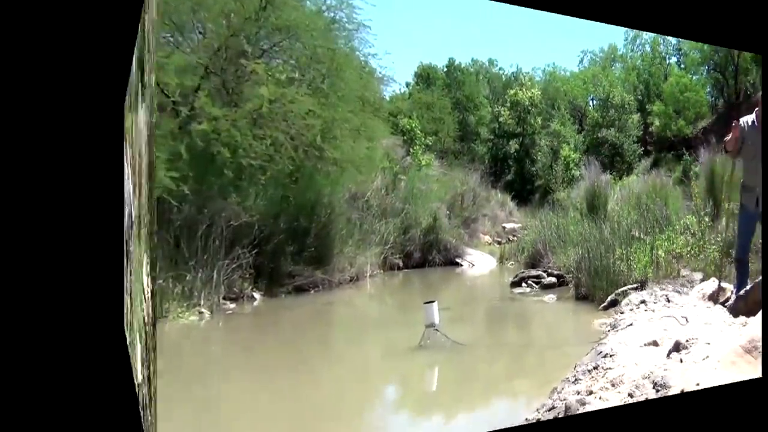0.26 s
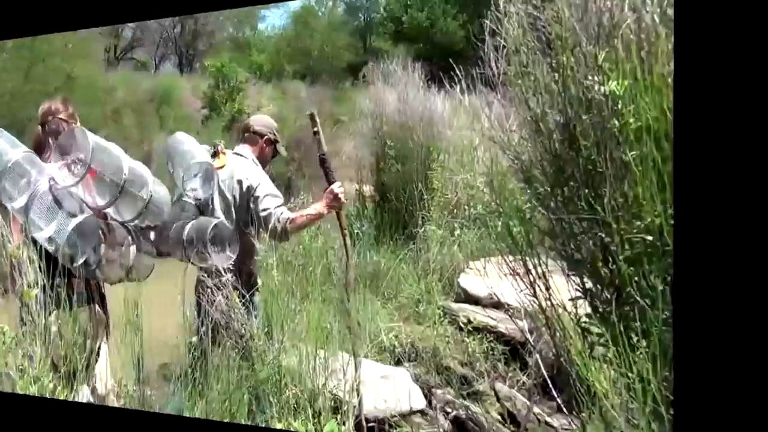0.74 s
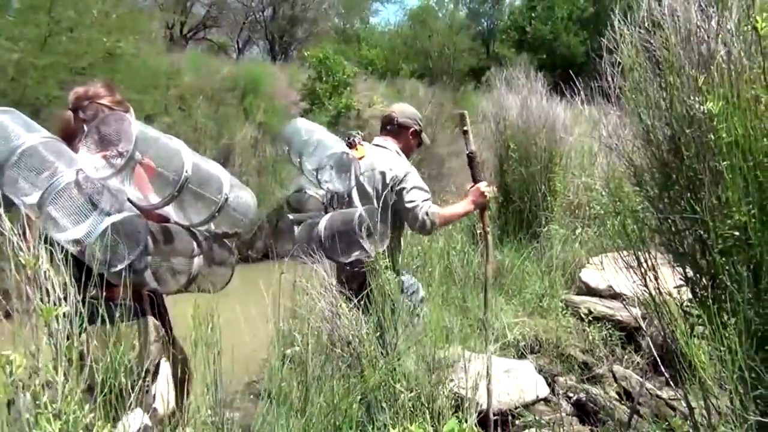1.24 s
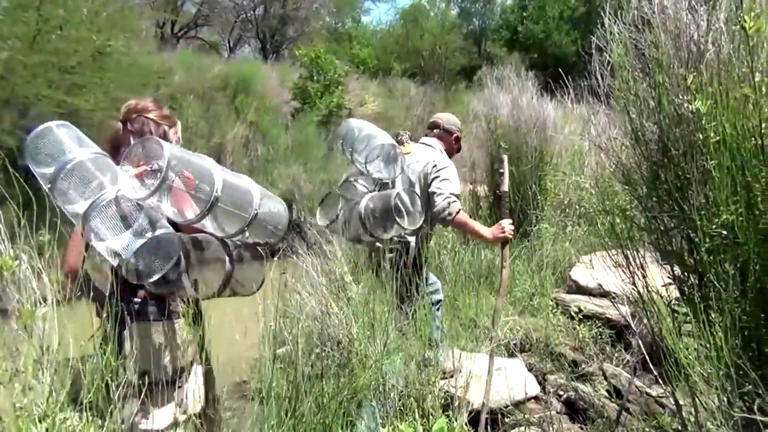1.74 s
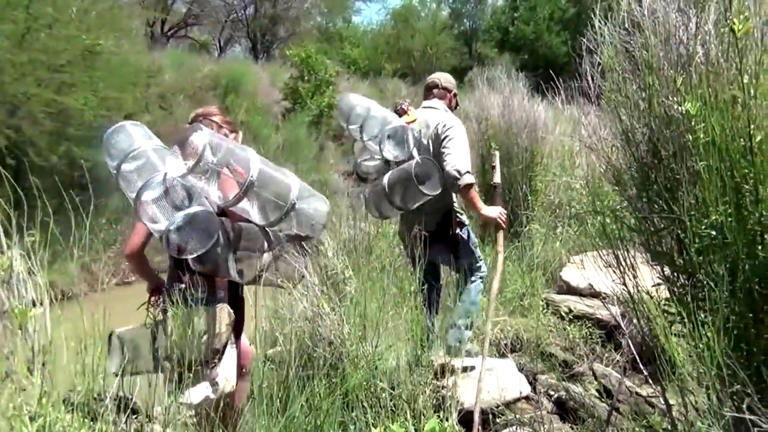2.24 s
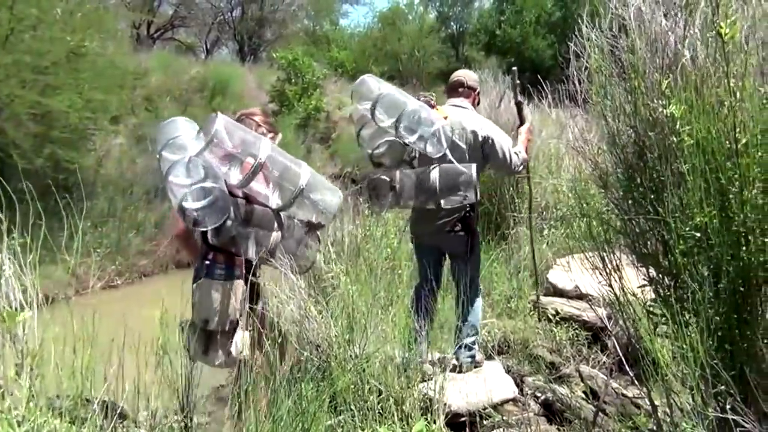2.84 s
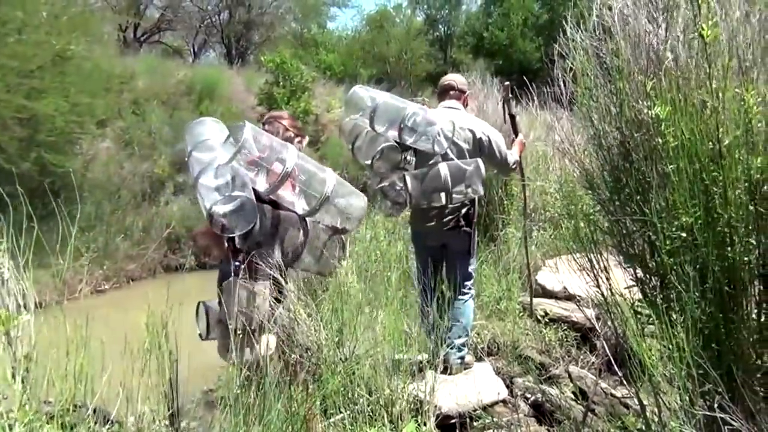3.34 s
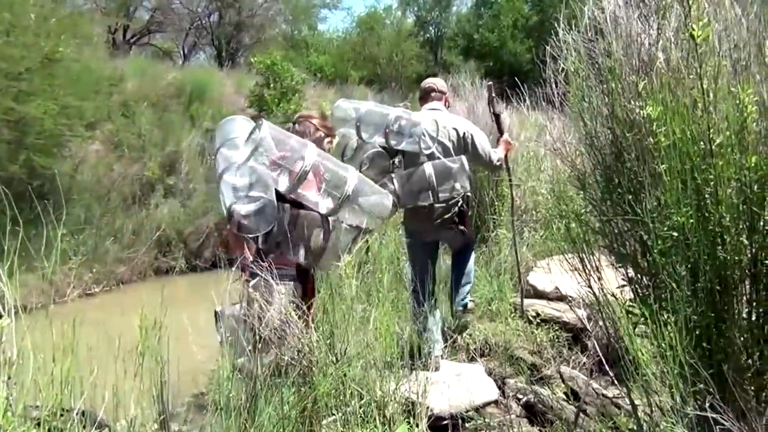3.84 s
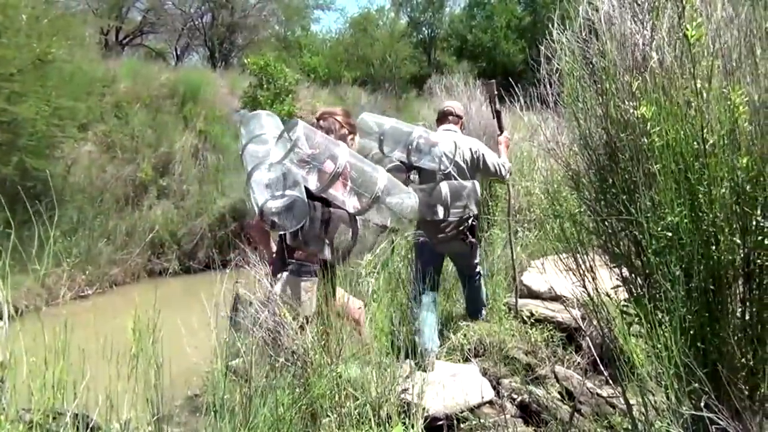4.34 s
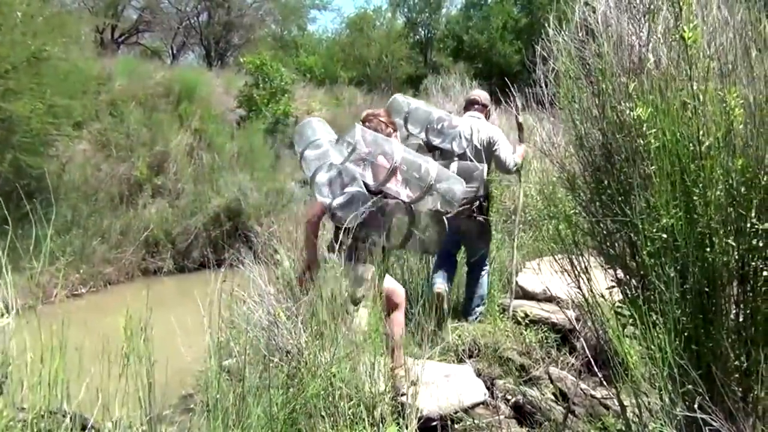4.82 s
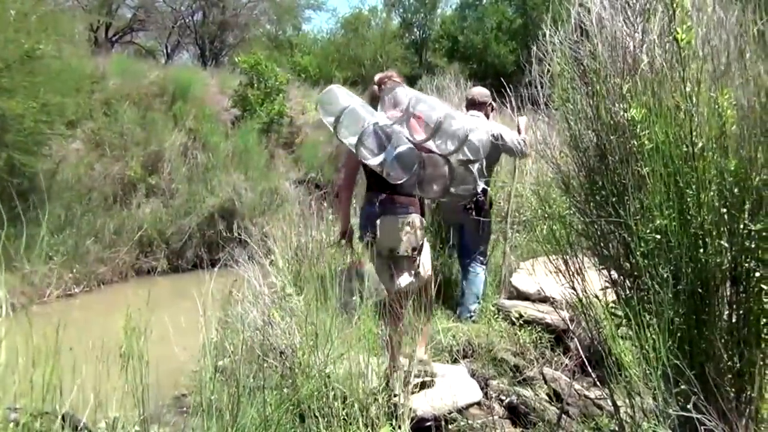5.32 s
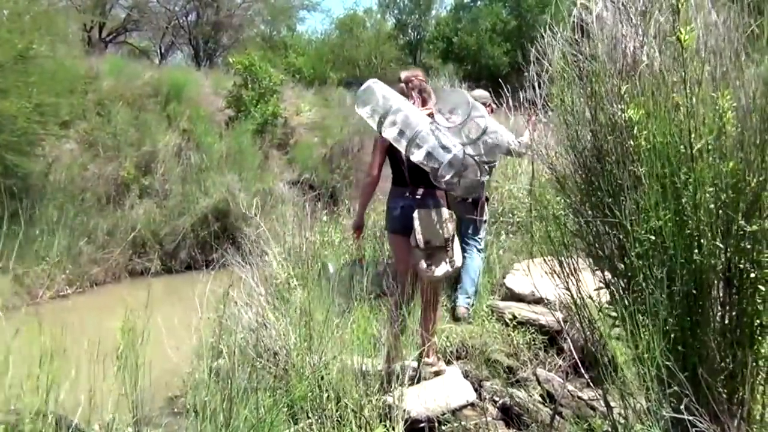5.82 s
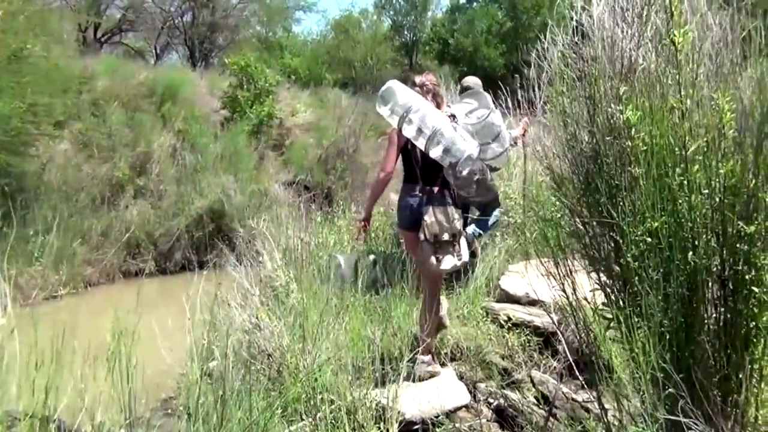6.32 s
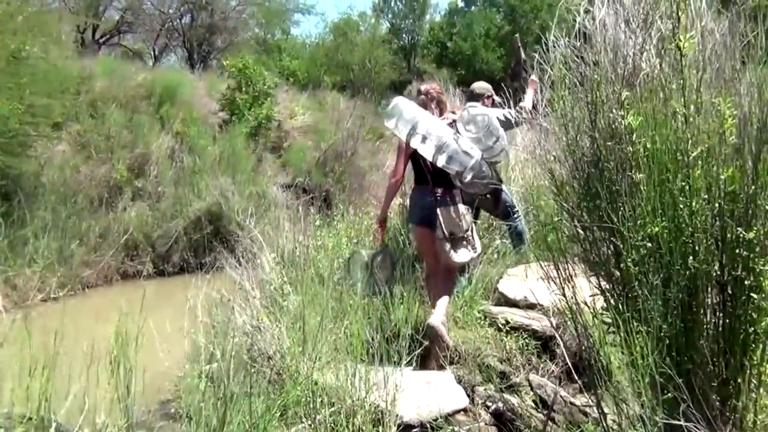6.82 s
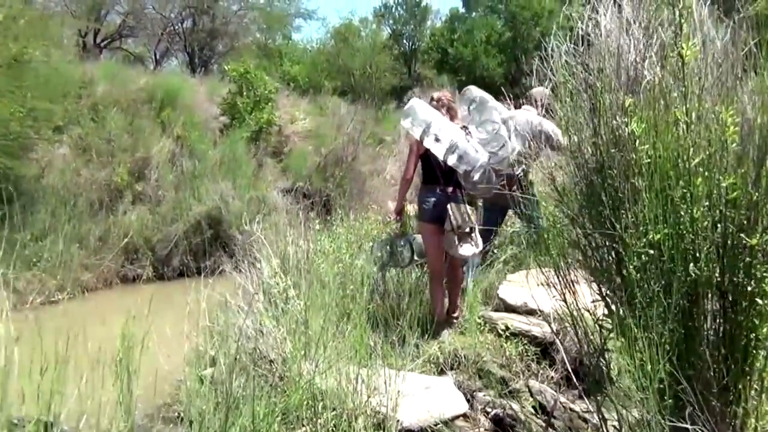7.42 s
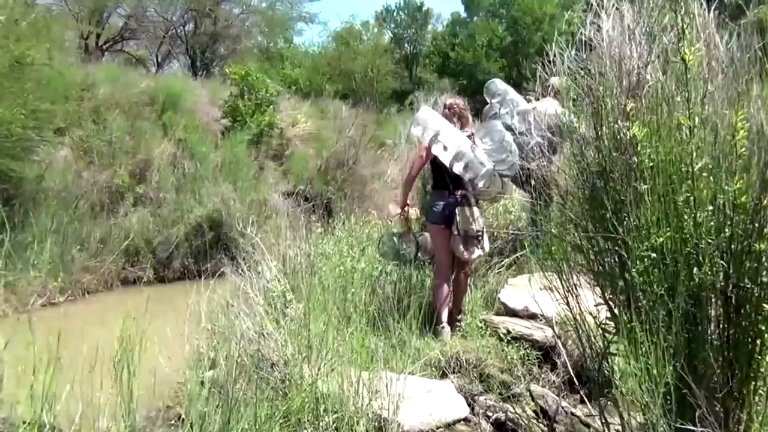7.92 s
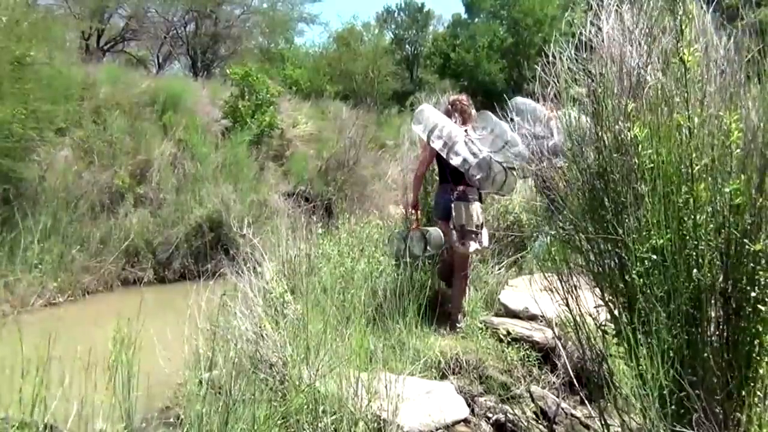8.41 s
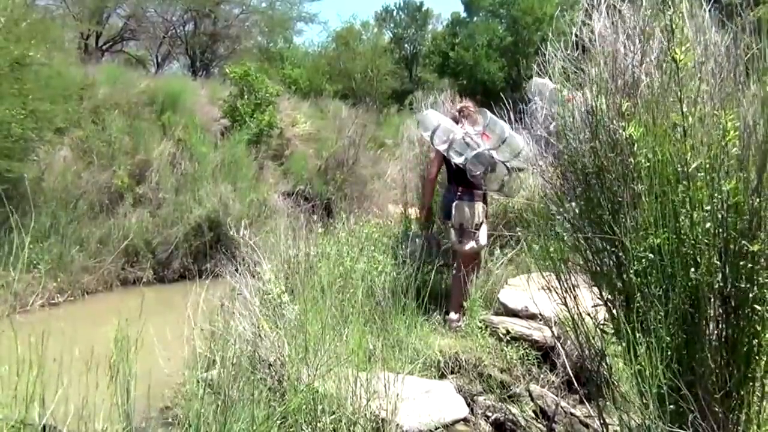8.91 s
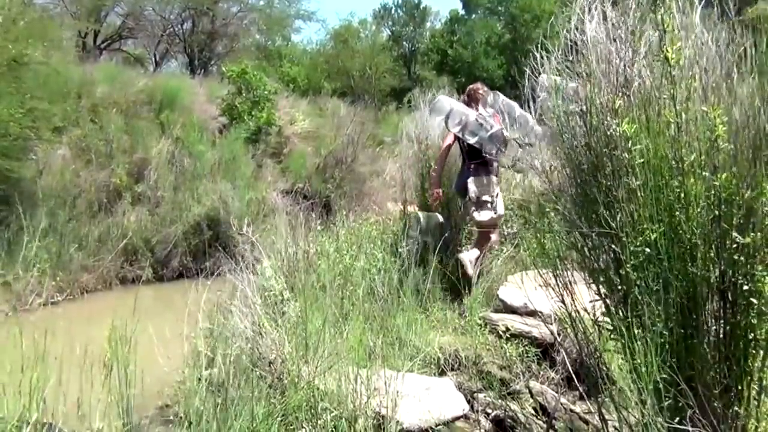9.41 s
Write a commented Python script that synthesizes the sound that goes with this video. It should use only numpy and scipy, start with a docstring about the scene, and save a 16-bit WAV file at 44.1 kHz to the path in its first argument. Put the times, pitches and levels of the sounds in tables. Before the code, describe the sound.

Outdoors on a creek bank, water trickles and bubbles, louder in the first second while an insect buzzes high. Hard hollow knocks of carried gear come close by early on, then soft bumps. Grass swishes past two walkers' legs, fuller around three to five seconds, and later dry stalks snap in a bright cluster near seven. Open air, close stereo microphone, slightly heavier on the right.

```python
"""Tall grass swishes past the legs of two people wading with wire traps: filtered noise and ticks in patches.
Dry stalks snap (noise bursts), boots crunch the bank (clicks), and gear knocks and bumps near the microphone
(bursts and dying modes). A creek trickles with ringing bubbles over a wash of noise, louder in the first second.
An insect buzzes at first as a pulsed high tone, a thin drone comes and goes far off,
and a breeze brushes the microphone as low noise, with most of its gusts late."""
import sys
import numpy as np
from scipy import signal
from scipy.fft import rfft, irfft
from scipy.io import wavfile
from scipy.ndimage import uniform_filter1d

SR = 44100
rng = np.random.default_rng(int(sys.argv[2]) if len(sys.argv) > 2 else 0)


def wav_out(sig):
    """Save sig, one row per channel (or a flat mono array), as 16-bit PCM at SR to the path in sys.argv[1]."""
    wavfile.write(sys.argv[1], SR, np.round(np.clip(np.atleast_2d(sig).T, -1, 1) * 32767).astype(np.int16))


N = 425873
TIME = np.arange(N) / SR  # seconds
BINS = np.fft.rfftfreq(N, 1 / SR)  # Hz


def amp(db):
    """Decibels to gain."""
    return 10 ** (np.asarray(db) / 20)


def unit(x):
    """Scales to an rms of one."""
    return x / np.sqrt(np.mean(x ** 2) + 1e-20)


def read(points, hz):
    """Reads a spectrum on a log-frequency axis."""
    f, value = np.transpose(points)
    return np.interp(np.log(hz + 1), np.log(f), value)


def follow(rows):
    """Each column of a curve table, at every sample."""
    s, *columns = np.transpose(rows)
    return [np.interp(TIME, s, c) for c in columns]


def add(mix, s, sound):
    """Mixes a sound in at a given time in seconds."""
    part = mix[:, max(round(s * SR), 0):][:, :sound.shape[-1]]
    part += sound[..., :part.shape[1]]


def hump(hz, sharp):
    """Gain of a broad resonance applied twice, as a function of frequency."""
    return lambda f: 1 / (1 + (sharp * (f / hz - hz / (f + 1))) ** 2)


# How alike the two microphone ports hear a sound: (frequency [Hz], likeness, held below 0.98)
PORT_LIKENESS = [(30, 2), (250, 0.5), (600, 0.52), (1200, 0.43), (1700, 0.58), (2600, 0.55), (3400, 0.34),
                 (4800, 0.47), (6000, 0.58), (8700, 0.6), (10000, 0.57), (15000, 0.6)]


def pair(x, gain):
    """Colours two unrelated signals and blends them into partly alike left and right."""
    f = np.fft.rfftfreq(x.shape[1], 1 / SR)
    same = np.clip(read(PORT_LIKENESS, f), 0, .98)
    mid, side = rfft(x)
    side = side * np.sqrt((1 - same) / (1 + same))
    return irfft(np.array([mid + side, mid - side]) * gain(f), x.shape[1])


def noise(gain, size=N):
    """Coloured two-channel noise of rms one."""
    return unit(pair(rng.standard_normal((2, size)), gain))


def wander(rate):
    """Slow chance of rms one, up to about the given changes a second."""
    return unit(irfft(rfft(rng.standard_normal(N)) / (1 + (BINS / rate) ** 4), N))


def crackle(per_s, spread_db):
    """Random clicks, mostly small and a few large, at the same instants in both channels."""
    size = amp(spread_db * np.minimum(rng.exponential(1, N), 5))
    struck = rng.random(N) < per_s / SR
    return unit(rng.standard_normal((2, N)) * size * struck)


def swell(s, length, rise):
    """A smooth rise to one at the given time, and a fall; rise is the share of the length before the top."""
    rise = np.clip(rise, .1, .9)
    u = (TIME - s) / length
    return np.exp(-np.minimum(abs(u) / np.where(u < 0, rise, 1 - rise), 10) ** 2)


def burst(hz, t60, sharp, hold, tail_db, tail_t60, size=8192):
    """A quick run of fractures or contacts in a broad resonance, then scatter from the bank."""
    t = np.arange(size) / SR
    fall = amp(-60 * np.maximum(t - hold, 0) / t60)
    shape = fall + amp(tail_db - 60 * t / tail_t60)
    return unit(noise(hump(hz, sharp), size=size) * shape) * np.sqrt(np.mean(shape ** 2))


def ring(modes, pitch, soft=.002, size=8192):
    """Dying modes of a struck object, with a peak of one; soft is the onset in seconds."""
    t = np.arange(size) / SR
    sound = sum(amp(db - 60 * t / t60) * np.sin(2 * np.pi * hz * pitch * t) for hz, db, t60 in modes)
    sound = sound * (1 - np.exp(-(t / soft) ** 2))
    return sound / abs(sound).max()


# Steady wading through the grass, before the trims in grass():
# (time [s], level [dB], thick stems [dB re level], dry tips [dB re level])
WADING = [(0.05, -52, -7, 1.5), (0.7, -53, -3.5, -4), (0.9, -49.5, -0.5, -6), (1.25, -54.5, -2.5, -5),
          (2.05, -49.5, -1, -7), (2.68, -50, -3.5, -11), (3.06, -42.5, -2, -23), (3.4, -46, -3, -18),
          (3.78, -40.5, -3, -23), (4.3, -41.5, -3, -16), (4.9, -45, -8.5, 1), (5.2, -45.5, -2.5, -17),
          (5.6, -54.5, 0, -7), (6.1, -55.5, -1, -2.5), (7.5, -46, -5.5, -2), (7.92, -54.5, -1.5, -4),
          (8.6, -57.5, -1.5, -3), (9.6, -48.5, -1.5, -3)]
# A leg sweeps through a tuft, before the same trims:
# (time of the top [s], level [dB], length [s], dry tips [dB re level])
LEG_SWEEPS = [(0.092, -51, 0.083, 0), (2.02, -45.5, 0.046, -5), (4.467, -41, 0.085, -3),
              (4.64, -42.5, 0.18, -6), (5.426, -55, 0.1, 8.5), (5.76, -57, 0.16, 2), (6.21, -50.5, .07, 1),
              (6.3, -54, 0.087, 7.5), (6.4, -50, 0.086, 0), (6.542, -46.5, 0.11, 6),
              (6.703, -50, 0.072, -6), (7.134, -47.5, 0.077, -1), (7.19, -45.5, .1, -6),
              (7.293, -47, 0.11, -5), (7.419, -37, 0.08, -7), (7.724, -39, 0.091, -3.5),
              (8.137, -51, .12, -9), (8.288, -50.5, 0.12, 2.5), (8.852, -49.5, 0.23, 0.5),
              (8.994, -44, .08, 1), (9.36, -46, .09, 0), (9.45, -45.5, 0.049, -3), (9.58, -46, 0.11, -7)]


def rustle_levels(sweep_rise=0.46, sweep_stems_db=-9, fade_in_s=0.082):
    """Gains of stems, blades and tips: steady wading with leg sweeps on top, which stir few thick stems."""
    level_db, stems_db, tips_db = follow(WADING)
    power = amp([level_db + stems_db, level_db, level_db + tips_db]) ** 2
    for s, db, length, dry_db in LEG_SWEEPS:
        peaks = amp([db + sweep_stems_db, db, db + dry_db])
        power += np.outer(peaks, swell(s, length, sweep_rise)) ** 2
    return np.sqrt(power) * np.minimum(TIME / fade_in_s, 1) ** 2


def patchy(x, depth_db):
    """Each blade rubs in its own narrow band for a few hundredths of a second."""
    z = signal.stft(x, nperseg=512)[2]
    field = rng.standard_normal(z.shape[1:])
    field = uniform_filter1d(field, size=6, axis=0)  # across frequency
    field = uniform_filter1d(field, size=8, axis=1)  # across time
    return signal.istft(z * amp(depth_db * unit(field)), nperseg=512)[1][:, :N]


# Colour of grass rubbing past legs: (frequency [Hz], level [dB])
GRASS_COLOUR = [(590, -31), (1000, -2.5), (1740, 2), (2090, -4), (2460, -1), (3440, -7), (6200, -0.5),
                (7550, -0.5), (8470, 2), (12400, -2), (13400, -11), (15100, -11), (15800, -33)]


def grass(grain_db=-4, per_s=2600, spread_db=2.0, flutter_db=1.16, clump_db=0.7, patch_db=1.48,
          stems_db=0, blades_db=1.5, tips_db=0):
    """Blades slide past legs and tick against each other, in uneven clumps."""
    rub = rng.standard_normal((2, N)) + amp(grain_db) * crackle(per_s, spread_db)
    unevenness = amp(flutter_db * wander(33) + clump_db * wander(15))
    rub = patchy(rub * unevenness, patch_db)
    # thick stems sound low, blades in the middle, dry tips highest: (frequency [Hz], level [dB])
    bands = (
        [(500, -10), (1300, -11.0), (2600, 0.5), (3400, 1.5), (4500, -38.0)],
        [(2500, -60), (3700, 3), (6000, 0.5), (9500, -3.0), (12000, -10)],
        [(9000, -12), (11500, -7.5), (15000, 1.5)])
    out = np.zeros((2, N))
    for trim_db, level, band in zip((stems_db, blades_db, tips_db), rustle_levels(), bands):
        part = unit(pair(rub, lambda f: amp(read(GRASS_COLOUR, f) + read(band, f))))
        out += amp(trim_db) * level * part
    return out


# Dry stalks breaking, a little to the right; level before the trims in stalks():
# (time [s], level [dB], pitch [Hz], t60 [s], sharpness of the resonance)
STALK_SNAPS = [(.394, -23, 8040, .016, 0.56), (.589, -29, 6000, .018, 0.56), (1.703, -29, 8800, 0.038, 1),
               (1.88, -29.5, 7460, 0.016, .8), (4.371, -25, 9000, .045, 0.57), (4.474, -26, 13000, .006, 1),
               (5.13, -21.5, 3800, 0.0057, .3), (6.27, -26.5, 9700, .0075, 1.1), (6.3, -32, 3060, .04, 2.4),
               (6.372, -22, 11500, 0.015, 0.87), (6.414, -24, 7240, 0.04, 0.56),
               (6.582, -26, 9000, .06, .6), (6.6924, -19.5, 7940, 0.027, 0.57),
               (7.171, -13.5, 8000, 0.012, 1.5), (7.179, -16, 8250, 0.021, 0.55),
               (7.2498, -10.5, 8400, 0.011, 0.66), (7.27, -23, 6600, .013, 0.84),
               (7.35, -10, 6560, .013, .9), (7.3498, -8, 7230, 0.016, 13), (7.3848, -7, 9300, .0065, 4.5),
               (7.385, -14.5, 6200, .012, 11), (7.699, -23, 8720, 0.035, 1.3),
               (7.782, -17.5, 2960, 0.011, 0.15), (8.864, -16, 11300, 0.011, 1.9),
               (9.523, -23, 8150, 0.03, 0.58), (9.5823, -20.5, 7440, 0.0071, 0.43)]


def stalks(snap_db=-8, tick_db=-9, right_db=0.6, wood_db=-38.5, wood_at_db=-17, wood_growth=0.69):
    """A dry stalk gives with a tick, then tears fibre after fibre while its woody body sounds."""
    out = np.zeros((2, N))
    for s, db, hz, t60, sharp in STALK_SNAPS:
        tick = amp(db + tick_db) * burst(hz, 0.0012, 0.65, hold=0, tail_db=-40, tail_t60=.03)
        tear = amp(db + snap_db) * burst(hz, t60, sharp, hold=0.00065, tail_db=-18.5, tail_t60=.08)
        # the body gains wood_growth dB for each dB of the snap
        body_db = wood_db + wood_growth * (db - wood_at_db) + snap_db
        body = amp(body_db) * burst(1400, 0.068, 1.0, hold=0.00082, tail_db=-37, tail_t60=.08)
        add(out, s, tick + tear + body)
    out = out * amp([[-right_db], [right_db]])
    treble = amp(read([(11000, 2.5), (13000, 1), (15500, -7)], BINS))
    return irfft(rfft(out) * treble, N)


# Boots pressing into the bank: (time [s], level [dB], pitch [Hz], length [s])
BOOT_TREADS = [(.098, -53.5, 486, 0.55), (1.857, -47.5, 350, 0.12), (3.179, -47.5, 790, 0.14),
               (4.418, -48, 302, 0.085), (4.831, -45.5, 1400, 0.07), (5.061, -56.5, 226, 0.37),
               (6.18, -50.5, 226, 0.25), (6.285, -43.5, 320, 0.065), (6.388, -45, 260, 0.07),
               (6.522, -48.5, 804, 0.2), (6.7, -50, 900, 0.19), (7.131, -40.5, 850, 0.072),
               (7.388, -53, 1700, 0.11), (7.641, -52, 110, 0.14), (8.223, -49, 1010, 0.21),
               (9.364, -44.5, 345, 0.07)]


def boots(crumbs_per_s=700):
    """Each tread crushes crumbs of soil and matted grass: a dull, swelling crunch."""
    out = np.zeros((2, N))
    crumbs = crackle(crumbs_per_s, 1.7)
    for s, db, hz, length in BOOT_TREADS:
        u = np.linspace(0, 8, int(2 * length * SR))
        press = u * np.exp(1 - u)  # strongest an eighth of the way in
        own_crumbs = np.roll(crumbs, int(s * SR), axis=1)[:, :len(u)]
        crunch = unit(pair(own_crumbs, hump(hz, 0.94)))
        add(out, s, amp(db) * press * crunch)
    return out


# Hard knocks of gear close by; level before the trims in gear(), thud and crack relative to the knock:
# (time [s], level [dB], pitch [Hz], t60 [s], sharpness, low thud [dB], bright crack before its lift [dB])
GEAR_KNOCKS = [(0.2905, -22.5, 1600, 0.058, 0.97, -7.5, -5.5), (0.6014, -16, 945, 0.073, 1.8, -8, -18),
               (1.5228, -16.5, 1010, 0.038, 1, -15, -13), (1.554, -9, 1600, 0.077, 0.76, -16, 0),
               (7.1338, -22.5, 1490, 0.022, 1.5, -5, -14)]
# Ringing modes of the knocked gear: (frequency [Hz], relative level [dB], t60 [s])
GEAR_MODES = [(1006, 5, 0.07), (1250, -8, 0.16), (1414, 10.5, 0.066), (1704, 3.5, 0.065), (2055, -4, 0.06),
              (2570, 1.5, 0.084), (3220, -2.5, 0.11)]
# Soft bumps close to the microphone: (time [s], level [dB], factor on the pitch)
SOFT_BUMPS = [(.154, -39, 1.12), (1.44, -29.5, 0.64), (1.555, -39, .52), (1.578, -32.5, 0.46),
              (1.873, -48, 1.22), (2.138, -39.5, 1.3), (2.53, -34, 0.69), (3.176, -21, 0.95),
              (3.323, -41, 0.85)]
# Modes of a bump, before the pitch factor: (frequency [Hz], relative level [dB], t60 [s])
BUMP_MODES = [(180, -2.5, 0.096), (272, 9.5, 0.053), (345, -3.5, 0.094)]


def gear(knock_db=-11.0, ring_db=-9, bump_db=0, rebound_s=.045, rebound_db=-17.5):
    """Hard knocks give a bright crack, a short ring and a low thud; dull bumps settle with a softer second."""
    out = np.zeros((2, N))
    for s, db, hz, t60, sharp, thud_db, crack_db in GEAR_KNOCKS:
        clack = burst(hz, t60, sharp, hold=0.0012, tail_db=-16, tail_t60=0.24)
        thud = amp(thud_db) * burst(320, 0.16, 0.51, hold=0.0036, tail_db=-25, tail_t60=0.17)
        crack_gain = amp(crack_db + 7.5)  # lifted
        crack = crack_gain * burst(4040, 0.0024, 3.5, hold=0.0006, tail_db=-19.5, tail_t60=0.15)
        add(out, s, amp(db + knock_db) * (clack + thud + crack))
        add(out, s, amp(db + ring_db) * ring(GEAR_MODES, 1.0, soft=0.0002))
    for s, db, pitch in SOFT_BUMPS:
        bump = amp(db + bump_db) * ring(BUMP_MODES, pitch, soft=0.0039)
        add(out, s, bump)
        add(out, s + rebound_s, amp(rebound_db) * bump)
    return out * amp([[-1.2], [1]])  # the gear is a little to the right


def opening(until_s=1.0, fall_s=0.068):
    """One through the first second, then a quick fall to zero: the creek and low air start out louder."""
    return np.clip(1 - (TIME - until_s) / fall_s, 0, 1)


def bubble(hz, t60, rise=0.1):
    """A bubble rings and rises in pitch as it nears the surface; rise is the share gained over t60."""
    t = np.arange(int(t60 * SR) + 2) / SR
    envelope = (1 - np.exp(-t * hz / 2)) * amp(-60 * t / t60)
    phase = 2 * np.pi * np.cumsum(hz * (1 + rise * t / t60)) / SR
    return envelope / envelope.max() * np.sin(phase)


def plinks(per_s, pitch_hz, peak_db, count=200):
    """Single near bubbles, spread about one pitch, each heard on its own."""
    out = np.zeros((2, N))
    draws = rng.random((count, 5))
    times = np.cumsum(2 * draws[:, 0] / per_s)
    for s, (_, pitch, size, life, side) in zip(times, draws):
        hz = pitch_hz * 2 ** (.9 * (pitch - .5))
        sound = bubble(hz, (30 + 45 * life) / hz, rise=.2)
        add(out, s, amp(peak_db - 7 * size) * np.outer([.5 + side, 1.5 - side], sound))
    return out


# Colour of the creek wash and still air: (frequency [Hz], level [dB])
WASH_COLOUR = [(15, -26), (25, -8.5), (76, -10), (152, -6), (333, -2.5), (403, -6), (604, -5.5),
               (1430, -6.5), (1870, -7), (2660, -14.5), (3130, -12.5), (7630, -20), (8970, -15),
               (10500, -19.5), (15800, -26)]
# Loud bubbles; level before the trim in creek(): (time [s], peak level [dB], pitch [Hz], t60 [s])
GURGLES = [(.9, -37, 1820, .045), (1.231, -36, 2060, 0.022), (1.63, -35, 2720, 0.054),
           (5.997, -38, 1700, .04), (7.284, -38.5, 884, 0.099), (7.409, -35, 1073, .06),
           (7.63, -32.5, 810, 0.13), (7.883, -39, 2570, 0.032), (7.998, -38, 1880, .05),
           (8.341, -36, 2550, .027), (8.348, -37.5, 1830, .04), (8.947, -37, 880, .13),
           (9.254, -31.5, 1900, .018)]


def creek(per_s=420, spread_db=2.5, cycles=36, babble_db=-57, water_db=-56.0, hollow_db=-64, gurgle_db=-3,
          wash_db=-51, surge_db=2.3, creek_db=-1, opening_db=6, gurgle_rise_per_s=3.1, count=64):
    """Bubbles of many sizes over a wash, a hollow note among the stones and a few loud gurgles, low and high."""
    flow = amp(creek_db + opening_db * opening() + surge_db * wander(3.3))
    babble = np.zeros((2, N))
    for hz in np.geomspace(560, 2700, count) * rng.uniform(.97, 1.03, count):
        starts = crackle(per_s / count, spread_db)
        babble += signal.oaconvolve(starts, bubble(hz, cycles / hz)[None], axes=1)[:, :N]
    babble = amp(babble_db) * unit(pair(babble, hump(1240, 0.33)))
    water = amp(water_db) * noise(hump(607, 0.68))
    hollow = amp(hollow_db) * noise(hump(612.5, 27))
    out = flow * (babble + water + hollow)
    out += plinks(17, 2000, -42.5) + plinks(6, 880, -45.5)
    for s, db, hz, t60 in GURGLES:
        add(out, s, amp(db + gurgle_db) * bubble(hz, t60, gurgle_rise_per_s * t60))
    # a steady haze of distant water and air lies under everything
    return out + amp(wash_db) * noise(lambda f: amp(read(WASH_COLOUR, f)))


def insect(pulses_per_s=64.5, depth=0.78, low_hz=8650, top_hz=9270, rasp_hz=130, hiss_db=-5,
           level_db=-50.5, rise_s=0.13, hold_until_s=1.25, fade_s=0.67):
    """A narrow high buzz whose pitch arches with each wing stroke; it swells, holds and dies away."""
    fade = 1 + (np.maximum(TIME - hold_until_s, 0) / fade_s) ** 4
    level = np.sqrt(np.minimum(TIME / rise_s, 1)) / fade
    arch = abs(np.sin(np.pi * np.cumsum(pulses_per_s * (1 + 0.018 * wander(3))) / SR))
    hz = low_hz + (top_hz - low_hz) * arch
    # two tones, each with its own rasp on the pitch
    tones = np.array([np.sin(2 * np.pi * np.cumsum(hz + rasp_hz * wander(500)) / SR) for ear in "LR"])
    buzz = unit(pair(tones, np.ones_like)) + amp(hiss_db) * noise(hump(8920, 5.2))
    return amp(level_db) * level * unit(buzz * (1 - depth + depth * arch))


def drone(hz=2500, sharp=6, level_db=-55, top_s=3.16, length_s=2.1):
    """A thin distant drone, probably another insect: a narrow band of hiss that slowly comes and goes."""
    return amp(level_db) * swell(top_s, length_s, 0.39) * noise(hump(hz, sharp))


# Gusts on the microphone; level before the trims in breeze(): (time of the top [s], level [dB], length [s])
GUSTS = [(2.41, -57, .13), (6.55, -51.5, 0.093), (6.78, -50.5, .08), (6.95, -44.5, 0.12), (7.06, -46, 0.18),
         (7.33, -54, 0.1), (7.65, -45, 0.11)]


def breeze(light_db=-65.5, opening_db=7.5, gust_db=-2, gust_rise=0.5, eddy_db=8.5, lump_db=2.5):
    """Lumpy low turbulence, stronger in the first second; gusts shed separate eddies at the left port."""
    gusts = sum(amp(db) * swell(s, length, gust_rise) for s, db, length in GUSTS)
    light = amp(light_db + opening_db * opening())
    air = np.hypot(light, amp(gust_db) * gusts) * noise(hump(56.6, 0.71))
    air[0] += amp(eddy_db) * gusts * noise(hump(40, 0.86))[0]
    return air * amp(lump_db * wander(15))


def scene():
    """Everything on the creek bank, in open air."""
    return grass() + stalks() + boots() + gear() + creek() + insect() + drone() + breeze()


# Balance of the two microphone ports: (frequency [Hz], left minus right [dB])
PORT_LEAN = [(40, -19.5), (130, -10), (300, -11.5), (600, -1.5), (1250, -3.5), (1700, -1), (2800, -2.5),
             (3600, -5), (5800, -1.5), (10000, -4), (12400, -8.5), (15000, -7.5)]


def record(dry, edge_hz=15850):
    """The right port is the louder one, most of all in the bass; then the band limit."""
    lean = amp(read(PORT_LEAN, BINS))
    gains = np.array([2 * lean, 2 + 0 * lean]) / (1 + lean)
    ports = irfft(rfft(dry) * gains, N)
    low_pass = signal.firwin(511, edge_hz, window=("kaiser", 9), fs=SR)
    return signal.oaconvolve(ports, low_pass[None], "same")


dry = scene()
out = record(dry)
wav_out(out)
```